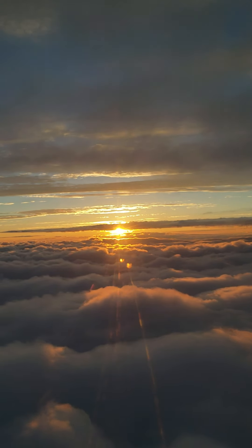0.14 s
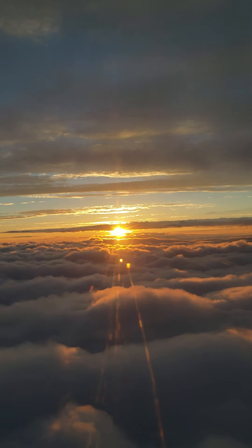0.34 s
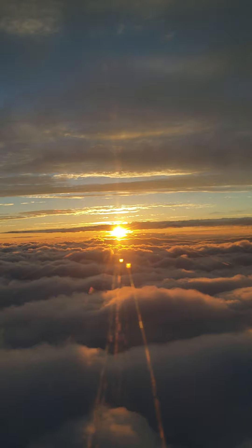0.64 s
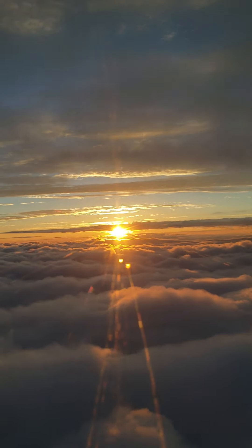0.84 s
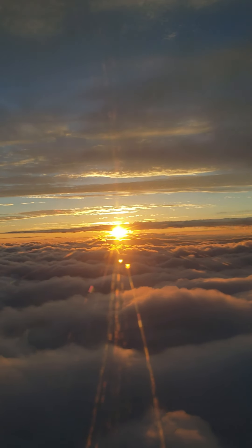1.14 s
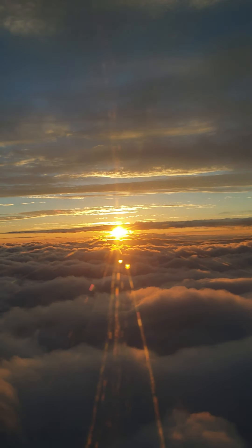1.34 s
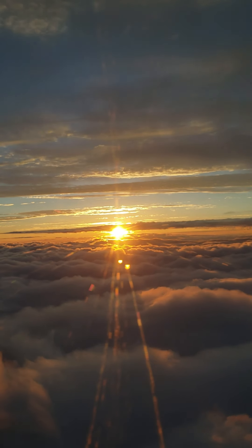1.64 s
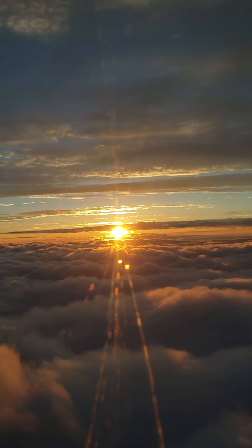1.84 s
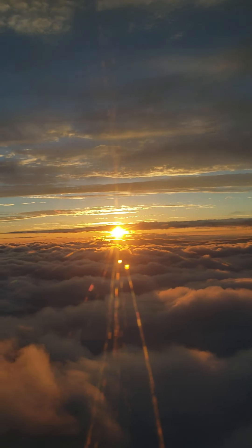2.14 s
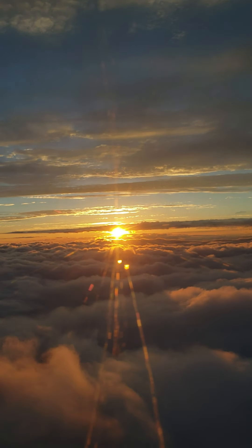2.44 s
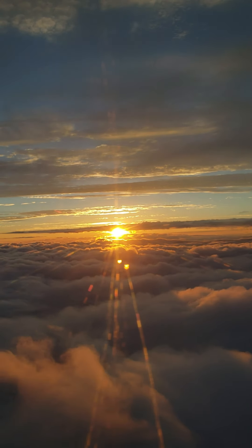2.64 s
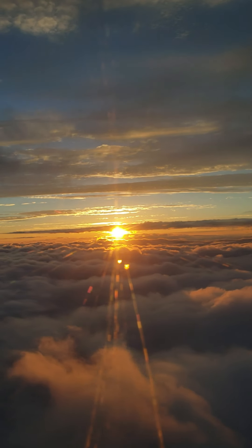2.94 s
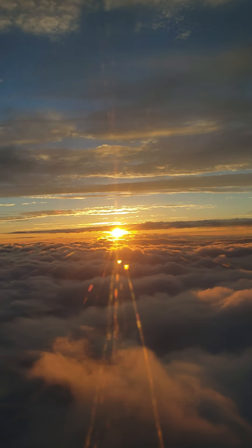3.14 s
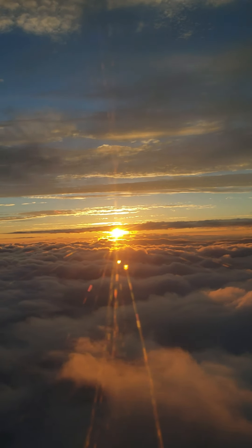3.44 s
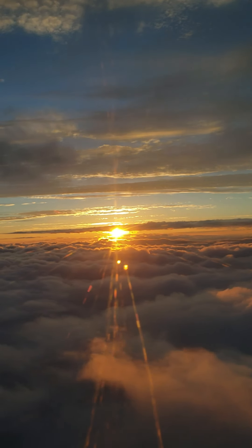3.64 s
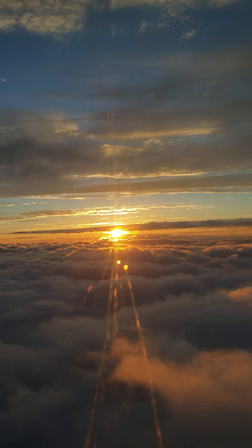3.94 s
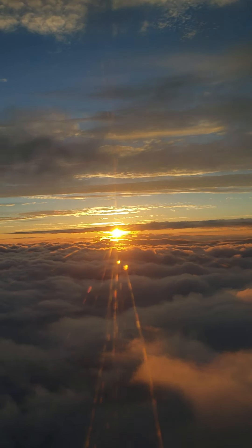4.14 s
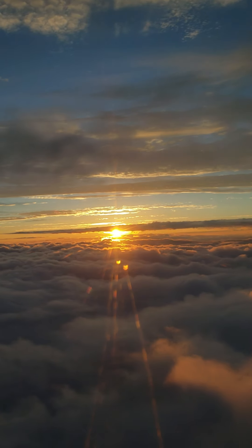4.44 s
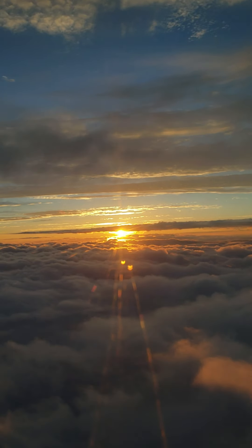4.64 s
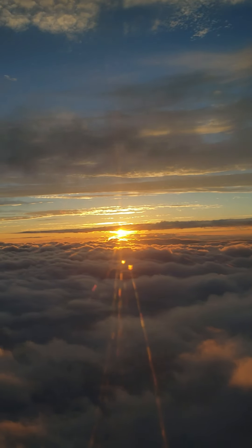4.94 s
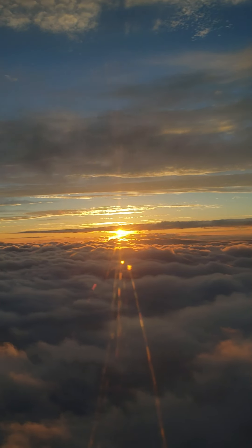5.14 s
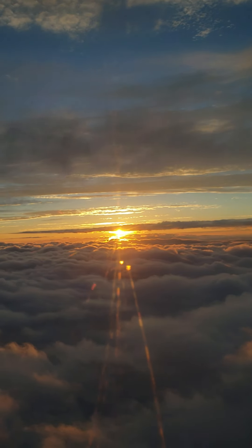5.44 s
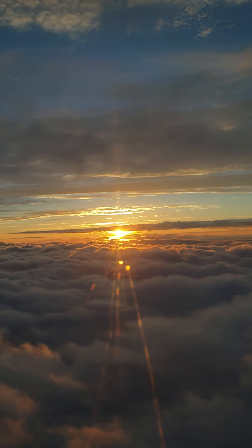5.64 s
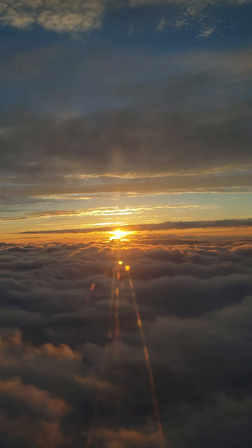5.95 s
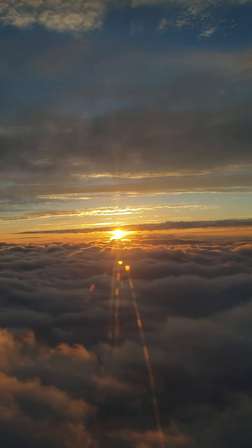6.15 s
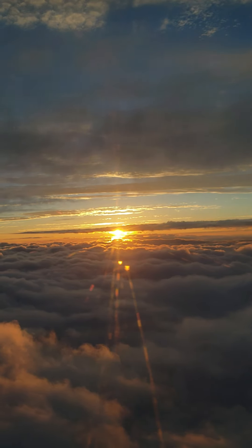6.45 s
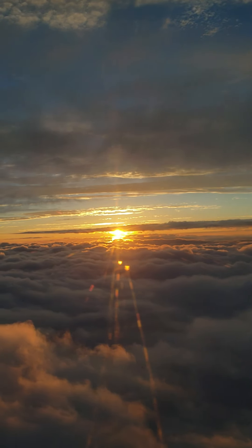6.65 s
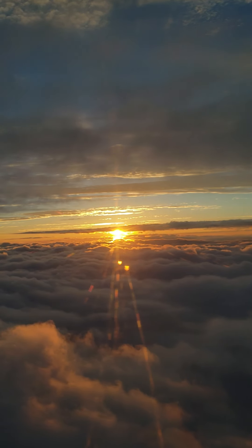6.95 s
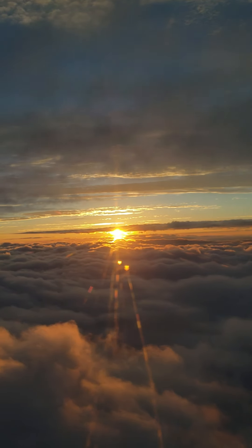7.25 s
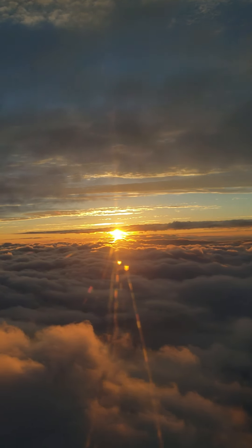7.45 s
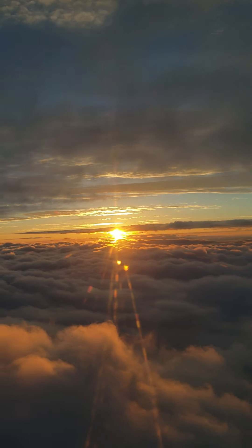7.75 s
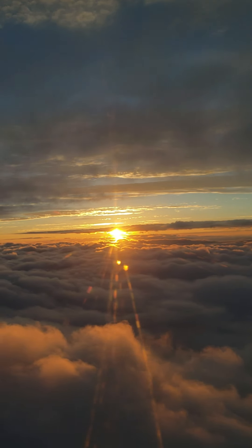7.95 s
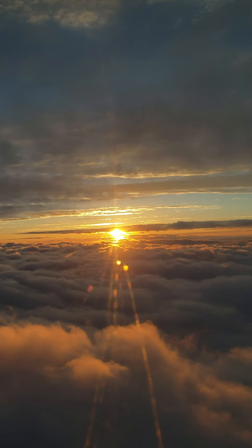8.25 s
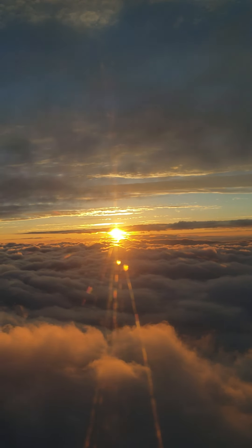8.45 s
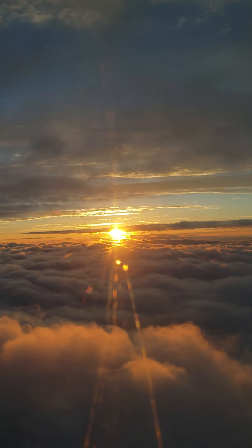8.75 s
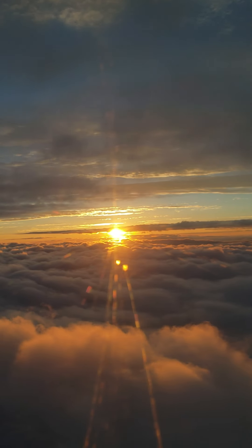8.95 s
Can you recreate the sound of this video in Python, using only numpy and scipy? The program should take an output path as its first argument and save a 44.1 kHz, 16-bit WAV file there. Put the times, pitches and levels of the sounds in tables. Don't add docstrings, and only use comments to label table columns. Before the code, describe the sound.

For about 9 seconds, the interior of an airliner in cruise is heard from a window seat. A dense, continuous low jet rumble and a muffled rush of air through the wall panels dominate, drifting up and down only slightly. A deep hum near 60 Hz wavers in strength, fuller around 1.2, 5.3 and 8.2 s, and sinks very slightly in pitch from 3 to 7.5 s. Faint vent hiss and a thin, high fan whine lie far beneath the roar. A small dull knock comes at 0.4 s, a sharp bright snap at 4.1 s, a lighter tick at 7.8 s, with barely audible ticks between. From 8.35 s cloth softly brushes the seat, with a firmer rub at 8.9 s and a tiny, brief metallic ring. The roar continues until it cuts off. Stereo, bass centred, treble spread wide.

```python
import sys
import numpy as np
from scipy import signal
from scipy.fft import rfft, irfft, next_fast_len
from scipy.io import wavfile

SR = 44100
rng = np.random.default_rng(int(sys.argv[2]) if len(sys.argv) > 2 else 0)


def bounce(signal):
    frames = np.transpose(np.atleast_2d(signal))
    limited = np.clip(frames, -1, 1)
    pcm = np.round(limited * 32767).astype(np.int16)
    wavfile.write(sys.argv[1], SR, pcm)


def voltage_ratio(decibels):
    exponent = np.asarray(decibels, float) / 20
    return 10 ** exponent


N = 401310


def rms_one(x):
    return x / np.sqrt(np.mean(x ** 2) + 1e-20)


def in_time(rows):
    s, *columns = np.transpose(rows)
    return [np.interp(np.arange(N) / SR, s, c) for c in columns]


def at_hz(points, hz):
    at, *columns = np.transpose(points)
    return [np.interp(np.log(hz + 1), np.log(at), c) for c in columns]


def resonate(x, hz, width_hz):
    r = np.exp(-np.pi * width_hz / SR)
    zeros = np.array([1, 0, -1]) * (1 - r * r) / 2
    poles = [1, -2 * r * np.cos(2 * np.pi * hz / SR), r * r]
    return signal.lfilter(zeros, poles, x)


def strokes(rows):
    t = np.arange(N) / SR
    gain = np.zeros(N)
    for s, rise, hold, fall, db in rows:
        corners = s + np.cumsum([0, rise, hold, fall])
        gain += voltage_ratio(db) * np.interp(t, corners, [0, 1, 1, 0])
    return gain


# (frequency [Hz], width [Hz], lift [dB])
PANELS = [(89, 8.6, 1.5), (146.4, 13.6, 6.5), (250.3, 22, 3.5), (304, 9.1, 5.5), (497.6, 39, 6),
          (621.5, 38, 4.5), (2676, 340, 4)]
# (frequency [Hz], likeness [0-1], lead of the right port [rad])
LIKENESS = [(60, .999, .02), (140, .98, 0), (250, .965, .05), (350, .77, -.08), (500, .82, -.12),
            (570, .51, .49), (680, .5, .7), (900, .49, -.08), (1050, .21, -1.13), (1200, .18, -2.74),
            (1900, .32, -2.72), (2100, .15, -.9), (2400, .34, -1.6), (3000, .15, -4.2)]


def cabin_field(spectrum, shading):
    size = next_fast_len(N)
    hz = np.fft.rfftfreq(size, 1 / SR)
    shared, own = rfft(rng.standard_normal((2, size)))
    level_db = at_hz(spectrum, hz)[0]
    for panel_hz, width_hz, lift_db in PANELS:
        level_db = level_db + lift_db / (1 + (2 * (hz - panel_hz) / width_hz) ** 2)
    alike, lead = at_hz(LIKENESS, hz)
    alike = np.clip(alike, 0, 1)
    right = alike * np.exp(1j * lead) * shared + np.sqrt(1 - alike ** 2) * own
    lean_db = at_hz(shading, hz)[0] / 2
    ports = np.array([shared * voltage_ratio(level_db + lean_db), right * voltage_ratio(level_db - lean_db)])
    pair = irfft(ports, size)[:, :N]
    return pair / np.std(pair.mean(axis=0))


# (time [s], level about the mean [dB])
SWELL = [(0, 0.7), (1.1, -0.4), (2.0, .3), (3.0, -0.56), (3.9, -.4), (4.9, .5), (6.3, -0.27), (7.3, .5),
         (9.1, .1)]


def flow_gain(mean_db, follows):
    return voltage_ratio(mean_db + follows * in_time(SWELL)[0])


# (frequency [Hz], density [dB per Hz])
HISS = [(7000, -30), (8300, -7), (9300, 1), (11000, -1), (13500, 1.5), (16000, 3), (18000, -4)]
# (frequency [Hz], left minus right [dB])
AIR_LEFT_OVER_RIGHT = [(3400, -10), (3900, 0), (4500, 0), (5000, -5), (5800, -.1), (6300, -1),
                       (6900, -15.5), (7800, -7), (8400, 0), (9000, 1.1), (11000, 3), (13300, 5),
                       (15500, 7)]


def top_hiss():
    return flow_gain(-61, .7) * cabin_field(HISS, AIR_LEFT_OVER_RIGHT)


# (frequency [Hz], density [dB per Hz])
VENT = [(3000, -29), (3600, -8), (3850, -1), (4200, 2), (4700, -0.5), (5100, -2.5), (5450, -5.5),
        (6100, -6.5), (6800, -9), (7300, -16.5), (8300, -22.5), (10000, -33)]


def vent_air():
    return flow_gain(-53.5, .9) * cabin_field(VENT, AIR_LEFT_OVER_RIGHT)


# (frequency [Hz], width [Hz], left rms [dB], right rms [dB])
ROTORS = [(77, 1.6, -37, -38), (195, 3, -33, -34.5), (3890, 4, -67, -80)]
# (frequency [Hz], width [Hz], left rms [dB], right rms [dB])
WHINE = [(4940, 20, -76, -69), (4995, 18, -65.5, -63), (5055, 18, -78, -63), (5085, 20, -70, -74),
         (5125, 26, -80, -70)]


def rotor_lines():
    out = np.zeros((2, N))
    for hz, width_hz, left_db, right_db in ROTORS + WHINE:
        noise = rng.standard_normal(N + SR)
        line = resonate(resonate(noise, hz, width_hz), hz, width_hz)[SR:]
        out += rms_one(line) * voltage_ratio(np.array([[left_db], [right_db]]))
    return out


# (time [s], peak [dB], frequency [Hz], width [Hz], left minus right [dB])
TICKS = [
    (.3875, -28, 3100, 700, 4),
    (2.306, -49, 13500, 1500, 4),
    (3.712, -46, 13000, 1500, 6),
    (4.0855, -26, 13000, 1000, 6),
    (4.0864, -18, 11800, 700, 5),
    (4.0914, -32, 12000, 800, 0),
    (5.601, -47, 15000, 700, -0.5),
    (5.66, -47, 12500, 1800, -3),
    (7.788, -38, 12400, 1000, 3),
    (8.03, -47, 13500, 1800, 1),
]


def trim_ticks():
    tail_db, tail_t60_s = -18, .11
    out, t = np.zeros((2, N)), np.arange(SR // 5) / SR
    for s, peak_db, hz, width_hz, lean_db in TICKS:
        decay = 2 * np.pi * width_hz * t
        ring = np.sin(2 * np.pi * hz * t) * decay ** 2 * np.exp(2 - decay) / 4
        hissy = resonate(rng.standard_normal((2, len(t))), hz * 1.25, 5.0 * width_hz)
        scatter = rms_one(resonate(hissy, hz * 1.04, 3.5 * width_hz))
        tail = voltage_ratio(tail_db - 60 * t / tail_t60_s) * np.minimum(t / 0.0026, 1) * scatter
        at = round(s * SR)
        gain = voltage_ratio(peak_db + lean_db * np.array([[.5], [-.5]]))
        out[:, at:at + len(t)] += gain * (ring + tail)
    return out


# (start [s], attack [s], hold [s], release [s], rms [dB])
BRUSHES = [
    (8.35, .15, .35, .1, -55),
    (8.86, .06, .01, .08, -44),
    (8.95, .04, .2, .1, -49),
]


def rustle():
    roughness = voltage_ratio(3.0 * rng.standard_normal((2, N)))
    grain = rng.standard_normal((2, N)) * roughness
    return strokes(BRUSHES) * rms_one(resonate(resonate(grain, 3100, 1800), 3200, 2200))


# (start [s], attack [s], hold [s], release [s], rms [dB])
FITTING = [
    (8.925, .025, .03, .025, -51),
]


def fitting():
    ring = np.sqrt(2) * np.sin(2 * np.pi * 3170 * np.arange(N) / SR)
    return strokes(FITTING) * voltage_ratio(np.array([[-5.0], [2.5]])) * ring


# (time [s], rms [dB])
HUM = [(0, -24.5), (1.25, -18.5), (1.9, -24), (3.1, -22), (3.8, -25), (4.4, -21), (5.3, -17.5),
       (6.1, -18.5), (7.05, -24.5), (7.6, -18.5), (8.2, -17), (8.9, -18), (9.1, -21)]


def shaft_hum():
    cruise_hz, eased_hz = 60.4, 59.35
    ease_from_s, ease_to_s = 3.0, 7.5
    turns_hz = np.interp(np.arange(N) / SR, [ease_from_s, ease_to_s], [cruise_hz, eased_hz])
    lean_db = np.array([[.45], [-.45]])
    phase = 2 * np.pi * np.cumsum(turns_hz) / SR
    return np.sqrt(2) * voltage_ratio(in_time(HUM)[0] + lean_db) * np.sin(phase)


# (frequency [Hz], density [dB per Hz])
RUSH = [(230, -18), (320, 0), (570, -3.5), (900, 1), (1050, -4), (1350, -10), (1900, -12), (2150, -18),
        (2450, -23.5), (3000, -30), (3500, -30.5), (3720, -34), (4200, -60), (6000, -80)]
# (frequency [Hz], left minus right [dB])
LEFT_OVER_RIGHT = [(60, .9), (140, 2.7), (250, 1.4), (420, 4.5), (600, .7), (850, -2.5), (1300, -.2),
                   (2000, -4.2), (2400, -4.8), (2700, -3), (3000, -5.5), (3400, -9), (3900, 1.4)]


def boundary_layer_rush():
    return flow_gain(-22, 0.91) * cabin_field(RUSH, LEFT_OVER_RIGHT)


# (frequency [Hz], density [dB per Hz])
RUMBLE = [(24, -22), (33, -21.5), (40, -20), (46, -2.5), (54, 4), (70, 1.5), (110, -1), (180, 0.5),
          (260, 0), (285, -5.5), (330, -15.5), (420, -56)]


def jet_rumble():
    return flow_gain(-18.5, 1.3) * cabin_field(RUMBLE, LEFT_OVER_RIGHT)


def scene():
    air = top_hiss() + vent_air()
    near_seat = trim_ticks() + rustle() + fitting()
    roar = boundary_layer_rush() + jet_rumble()
    return air + rotor_lines() + near_seat + shaft_hum() + roar


def band_limit(x):
    return signal.sosfilt(signal.butter(12, 16580, fs=SR, output="sos"), x)


# (frequency [Hz], width [Hz], depth [dB])
PORT_DIP = (8280, 1150, -8)


def record(dry):
    dip_hz, width_hz, depth_db = PORT_DIP
    ports = dry - (1 - voltage_ratio(depth_db)) * resonate(dry, dip_hz, width_hz)
    low_pass = signal.ellip(14, .3, 60, 15760, fs=SR, output="sos")
    ports = signal.sosfilt(low_pass, ports)
    ports = ports * np.minimum(np.arange(N)[::-1] / (.001 * SR), 1)
    return band_limit(ports)


dry = scene()
out = record(dry)
bounce(out)
```